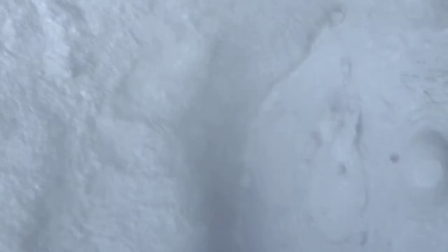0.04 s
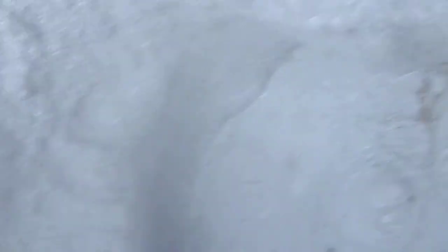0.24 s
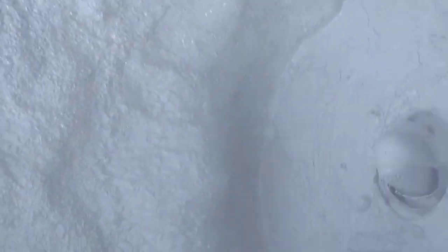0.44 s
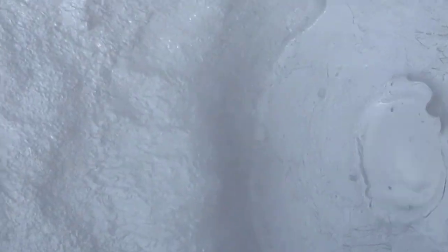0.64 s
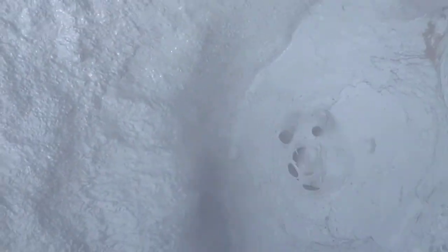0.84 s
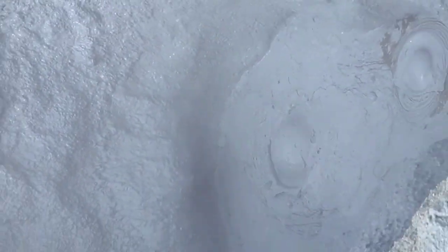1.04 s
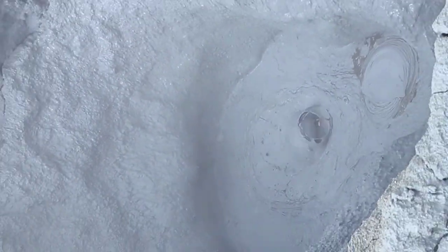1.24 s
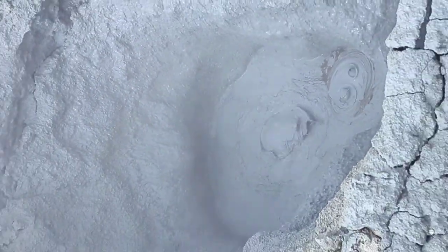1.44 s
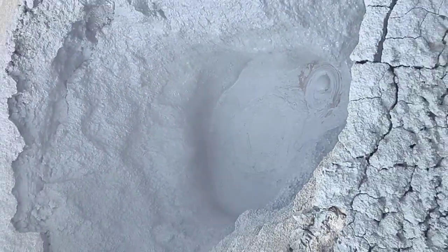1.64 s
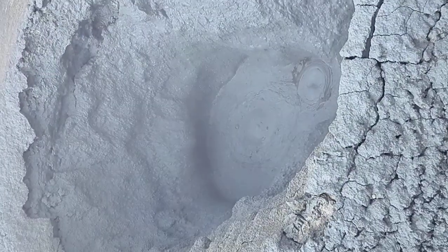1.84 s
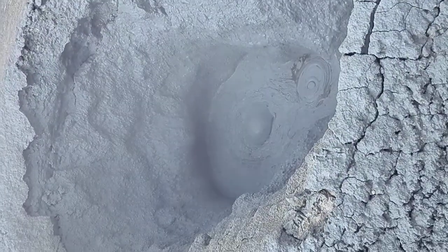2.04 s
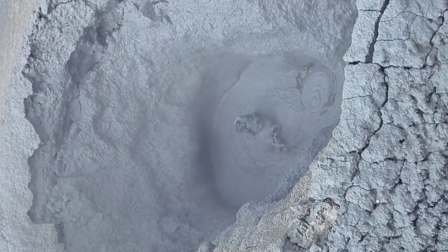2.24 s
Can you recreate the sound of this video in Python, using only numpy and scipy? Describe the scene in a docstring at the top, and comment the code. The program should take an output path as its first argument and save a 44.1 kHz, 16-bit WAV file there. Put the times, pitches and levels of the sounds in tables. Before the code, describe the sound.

A pool of thick mud bubbles in the open air, with dull plops, wet flecks and faint puffs of gas. A thin motor whine with one sharp click passes in the middle, while wind rumbles softly on the microphone.

```python
"""A pool of thick mud boils outdoors. Big bubbles burst with low plops as their cavities resonate,
flecks spatter back and gas puffs out, over a dense churn of small bubbles, a low wind and faint steam.
Midway a small motor ticks up to a thin buzz, its gear teeth exciting the resonances of its housing.
The gear clacks lightly as it starts and once loudly later; the level dips and recovers, and the
motor stops."""
import sys
import numpy as np
from scipy import signal
from scipy.fft import rfft, irfft
from scipy.io import wavfile

SR = 44100
rng = np.random.default_rng(int(sys.argv[2]) if len(sys.argv) > 2 else 0)


def transcribe(signal):
    """Save signal, clipped to [-1, 1], as a 16-bit WAV file at the path in sys.argv[1]."""
    frames = np.atleast_2d(signal).T
    limited = np.clip(frames, -1, 1)
    pcm = np.round(limited * 32767).astype(np.int16)
    wavfile.write(sys.argv[1], SR, pcm)


N = 105840


def undb(db):
    """Convert decibels to an amplitude ratio."""
    return 10 ** (np.asarray(db) / 20)


def unit(x):
    """Normalise to an rms of 1."""
    return x / np.sqrt(np.mean(x ** 2) + 1e-20)


def clock():
    """Time of every sample in seconds."""
    return np.arange(N) / SR


def curve(table, column=1):
    """Linear interpolation of one column of a table over time."""
    rows = np.array(table)
    return np.interp(clock(), rows[:, 0], rows[:, column])


def colour(x, spectrum):
    """Minimum-phase filter that keeps the power of white noise. Each row: frequency in Hz, gain in dB."""
    size = 2 * N
    hz, db = np.array(spectrum, float).T
    bin_hz = np.arange(N + 1) * SR / size
    gain = unit(undb(np.interp(np.log(bin_hz + 1), np.log(hz), db)))
    cepstrum = irfft(np.log(gain))
    cepstrum[1:N] *= 2  # folding the cepstrum makes the filter causal
    cepstrum[N + 1:] = 0
    return irfft(rfft(x, size) * np.exp(rfft(cepstrum)))[:N]


def noise():
    """Gaussian white noise."""
    return rng.standard_normal(N)


def walk(per_s):
    """Random fluctuation of rms 1, with per_s turning points a second."""
    knots = rng.standard_normal(2048)
    return unit(np.interp(clock() * per_s, np.arange(len(knots)), knots))


def add(out, start, x):
    """Superpose x on out at a start time in seconds."""
    i = int(np.clip(start * SR, 0, N - 1))
    out[i:i + len(x)] += x[:N - i]


def burst(decay_s, size=4096):
    """Exponentially damped noise, whose energy is set by its decay time."""
    envelope = np.exp(-np.arange(size) / SR / decay_s)
    return unit(rng.standard_normal(size) * envelope) * np.sqrt(np.mean(envelope ** 2))


def bubble(hz, cycles, rise_per_cycle=0.0046):
    """Damped cavity resonance: the tone peaks after the given cycles and dies, its pitch rising a little."""
    elapsed = np.arange(int(6 * cycles / hz * SR)) * hz / SR  # in cycles
    envelope = (elapsed / cycles * np.exp(1 - elapsed / cycles)) ** 2
    return envelope * np.sin(2 * np.pi * elapsed * (1 + rise_per_cycle * elapsed / 2))


def crowd(per_s, low_hz, high_hz, spread_db, cycles):
    """Incoherent sum of bubbles at random times and pitches, most weak and a few strong."""
    out = np.zeros(N)
    for when, pitch, strength, length in rng.random((int(per_s * N / SR), 4)):
        hz = low_hz * (high_hz / low_hz) ** pitch
        gain = hz * undb(-spread_db * np.log(1 - .98 * strength))
        add(out, when * N / SR, gain * bubble(hz, cycles * (.5 + length)))
    return out


def churn():
    """Small bubbles resonate and the mud absorbs their treble: larger ones gulp, finer ones simmer."""
    # Strength of the churn. Each row: time in seconds, level of larger and of finer bubbles in dB.
    levels = [(0, -38, -39.5), (.18, -36, -40.5), (.3, -44, -46.5), (.42, -35.5, -44.5), (.52, -39.5, -46),
              (.67, -38, -45.5), (.85, -39.5, -48), (1.1, -39, -48), (1.25, -42, -49.5), (1.45, -37.5, -50),
              (1.6, -36.5, -49.5), (1.7, -35, -42), (1.77, -40.5, -47.5), (1.9, -36, -39.5),
              (2.02, -37, -40.5), (2.15, -36, -42), (2.39, -41, -43.5)]
    # Muffling of each size of bubble. Each row: frequency in Hz, relative gain in dB.
    larger_spectrum = [(50, -47.5), (110, -11), (190, 3), (300, 0), (400, -14.5), (600, -16.5), (1000, -27),
                       (2000, -51)]
    finer_spectrum = [(200, -22), (380, 3.5), (520, 1), (800, -2.5), (1050, -13.5), (1400, -29),
                      (2400, -31.5), (3200, -35.5), (4000, -52), (7000, -72)]
    larger = crowd(per_s=700, low_hz=91.8, high_hz=727, spread_db=2.0, cycles=1.33)
    finer = crowd(per_s=2600, low_hz=299.5, high_hz=4090, spread_db=1.36, cycles=1.89)
    gulps = unit(colour(larger, larger_spectrum)) * undb(curve(levels))
    simmer = unit(colour(finer, finer_spectrum)) * undb(curve(levels, column=2))
    return gulps + simmer


def wind():
    """Turbulent pressure fluctuations make a low buffeting."""
    # Spectrum of the buffeting. Each row: frequency in Hz, relative gain in dB.
    spectrum = [(10, 1), (22, -7), (45, 4), (80, 0), (130, -1.5), (300, -27.5), (900, -61.5)]
    # Gusts and lulls. Each row: time in seconds, level in dB.
    gusts = [(0, -32.5), (.22, -37.5), (.32, -38.5), (.55, -32), (.8, -35), (1.2, -38), (1.55, -35.5),
             (1.84, -29), (1.96, -31.5), (2.15, -35), (2.39, -33.5)]
    return unit(colour(noise(), spectrum)) * undb(curve(gusts))


def steam():
    """Flow noise of air and steam: a faint hiss whose level flickers."""
    # Spectrum of the hiss. Each row: frequency in Hz, relative gain in dB.
    spectrum = [(1000, 19.5), (2200, -2), (4500, -6), (8000, -11.5), (12000, -3.5), (15500, 8)]
    # Slow swell of the hiss. Each row: time in seconds, mean level in dB.
    levels = [(0, -59), (.13, -71), (.5, -59.5), (.65, -63), (.8, -80), (1.6, -83), (1.76, -62), (2.1, -59),
              (2.39, -57)]
    flicker_db = -1.3
    return colour(noise(), spectrum) * undb(curve(levels) + flicker_db * walk(per_s=17.5))


def puffs():
    """Gas escapes through wet mud as turbulent noise, amplitude-modulated into short, grainy spurts."""
    # Spurts of gas. Each row: centre and Gaussian half-width in seconds, hiss and sputter levels in dB.
    spurts = [(0.025, 0.007, -51.5, -77), (0.041, 0.043, -55.5, -57), (0.236, 0.053, -61.5, -61),
              (0.455, 0.047, -68, -56.5), (0.59, 0.035, -54, -57.5), (0.653, 0.0078, -53.5, -52),
              (0.712, .02, -62, -60), (1.716, 0.021, -60, -51), (1.806, 0.01, -60, -56),
              (1.937, 0.028, -51, -52.5), (2.037, 0.014, -54, -58), (2.149, 0.015, -48.5, -55.5),
              (2.198, 0.011, -59, -53.5), (2.318, 0.013, -49, -59)]
    # Spectra of the hiss and the duller sputter. Each row: frequency in Hz, relative gain in dB.
    hiss_spectrum = [(1000, 13), (3000, -12), (6000, -14.5), (10000, -2.5), (14000, 1), (16000, 2)]
    sputter_spectrum = [(400, 7), (1000, 7), (2400, 3.5), (4000, -2.5), (6000, -8.5), (12000, -22)]
    hiss, sputter = np.zeros(N), np.zeros(N)
    for centre, half_width, hiss_db, sputter_db in spurts:
        envelope = np.exp(-((clock() - centre) / half_width) ** 2 / 2)
        hiss += undb(hiss_db) * envelope
        sputter += undb(sputter_db) * envelope
    grain_db = 3.17
    grain = unit(undb(grain_db * walk(per_s=500)))
    return (colour(noise() * grain * hiss, hiss_spectrum)
            + colour(noise() * grain * sputter, sputter_spectrum))


def flecks():
    """Impact noise of thrown mud: a wet snap on a soft thud, with a brief resonance of trapped air."""
    # Landings. Each row: start in seconds, relative snap level in dB, snap cutoff in Hz,
    # relative level of thud and note in dB.
    landings = [(.027, -33, 16000, -29.5), (.137, -32.5, 3700, -29.5), (.176, -45, 15000, -29.5),
                (.181, -49, 7000, -25), (.2, -43, 7000, -22.5), (0.2094, -27.5, 16100, -30),
                (.214, -37, 15000, -16.5), (0.2468, -37, 7000, -23), (0.2542, -23.5, 15100, -29),
                (0.2641, -25, 6760, -27), (0.2998, -31, 5100, -28.5), (.325, -45, 9100, -25),
                (0.3508, -41, 7500, -27.5), (0.3827, -29.5, 5300, -25.5), (.3905, -38, 5760, -22),
                (0.414, -50, 5000, -29.5), (.675, -54, 3000, -29.5), (2.153, -36.5, 16200, -34),
                (2.346, -55, 2500, -31)]
    # Spectra of the two parts of an impact. Each row: frequency in Hz, relative gain in dB.
    snap_spectrum = [(500, -2), (1500, -3), (2800, 2.5), (4800, -1.5), (7000, -2), (10000, 1), (14000, 1)]
    thud_spectrum = [(100, 2), (350, 2.5), (750, -1.5), (1100, -22.5), (1800, -25), (5000, -44.5)]
    snap_trim_db, thud_trim_db, note_trim_db = -2.5, -0.5, -13
    snap, thud, note = np.zeros(N), np.zeros(N), np.zeros(N)
    for start, snap_db, cutoff_hz, thud_db in landings:
        lowpass = signal.butter(6, min(cutoff_hz, .45 * SR), fs=SR, output="sos")
        add(snap, start, undb(snap_db + snap_trim_db) * signal.sosfilt(lowpass, burst(decay_s=0.001)))
        add(thud, start, undb(thud_db + thud_trim_db) * burst(decay_s=0.0052))
        note_hz = 662 * (1 + 0.29 * rng.standard_normal())
        add(note, start, undb(thud_db + note_trim_db) * bubble(note_hz, cycles=0.68))
    return colour(snap, snap_spectrum) + note + colour(thud, thud_spectrum)


def plops():
    """Big bubbles ring at their low cavity resonance while their skin tears with a dull splat."""
    # Bursting bubbles. Each row: start in seconds, pitch in Hz, level in dB, cycles to the peak.
    big_bubbles = [(0.197, 151, -12.5, 1.06), (.221, 177.5, -4.5, 0.74), (0.223, 295, -16.5, 2.6),
                   (.227, 460, -19.5, 1.25), (0.414, 75.6, -22, 1.5), (.441, 127, -23, 0.56),
                   (0.474, 192, -26, 1.3), (.545, 79, -22.5, 1.1), (.554, 233, -24.5, 1.41),
                   (0.602, 101, -29.5, 1.1), (.614, 173, -26, 1), (.707, 155.8, -17, 0.96),
                   (.845, 196, -27.5, 1.36), (1.01, 165, -35.5, 2.0), (1.139, 91.6, -22, 0.46),
                   (1.36, 92.7, -25, 0.98), (1.418, 87, -21, 0.84), (1.518, 186, -26.5, 1.64),
                   (1.55, 88.3, -22, 0.79), (1.62, 145.3, -16.5, 1.45), (1.645, 184, -18, 1.23),
                   (1.674, 72, -20.5, 0.73), (1.695, 499, -29, 2.6), (1.705, 275, -26.5, 1.68),
                   (1.709, 152, -15, 1.03), (1.775, 142.6, -20.5, 1.09), (1.813, 190, -26, 1.5),
                   (1.848, 182, -15, 0.46), (1.862, 190, -17.5, 1.1), (1.888, 233, -14, 0.46),
                   (2.032, 80, -20.5, 0.44), (2.033, 834, -32.5, 4.9), (2.14, 526, -25.5, 3.4),
                   (2.25, 88.7, -24, 0.55), (2.345, 404, -29, 1.1), (2.39, 140, -20, 0.5)]
    # Spectrum of the tearing skin. Each row: frequency in Hz, relative gain in dB.
    splat_spectrum = [(100, -16), (300, 4), (480, 13), (750, -12), (1300, -25), (3000, -32.5), (8000, -42)]
    splat_trim_db = -19.5
    tone, splat = np.zeros(N), np.zeros(N)
    for start, hz, db, cycles in big_bubbles:
        add(tone, start, undb(db) * bubble(hz, cycles))
        tear_s = start + cycles / hz / 2  # halfway to the tone's peak
        add(splat, tear_s, undb(db + splat_trim_db) * burst(decay_s=0.0073))
    return tone + colour(splat, splat_spectrum)


def motor():
    """Forced vibration: gear teeth click and scrape, strong and weak in turn, driving a small housing."""
    # The motor's run. Each row: time in seconds, ticks per second, whine and ring levels in relative dB.
    run = [(.64, 50.2, -65, -70), (.68, 65, -54, -51.5), (.73, 130, -52, -53.5), (.81, 180, -50.5, -59.5),
           (.87, 235, -50, -59), (.915, 292, -48.5, -58), (.96, 264, -51, -61), (1.04, 246, -50, -57.5),
           (1.11, 312, -50, -61.5), (1.15, 224, -52, -62), (1.2, 346, -50, -59.5), (1.27, 255, -54.5, -69),
           (1.36, 327, -55.5, -70), (1.44, 232, -57.5, -73), (1.53, 335, -56.5, -69), (1.6, 217, -56, -68),
           (1.735, 250, -52, -63)]
    # Resonances of the bright whine and the lower ring. Each row: frequency in Hz, relative gain in dB.
    whine_spectrum = [(1000, -45), (5000, -53), (8500, -13.5), (9600, -5.5), (11000, -6.5), (12400, 2.5),
                      (13800, 1), (15000, -9), (16000, -3)]
    ring_spectrum = [(1000, 4.5), (2600, -11.5), (3200, -3.5), (3900, -31), (5100, -28), (6000, -1.5),
                     (7600, -0.5), (8600, -17.5), (9600, 1), (12000, -4.5)]
    start_s, stop_s, tick_decay_s, rate_jitter = run[0][0], 1.741, .0005, .015
    scatter_db, alternate_db, rub_db, click_db = .6, .9, -6, -1
    t, tick_rate = clock(), curve(run)
    teeth_passed = np.cumsum(tick_rate * (1 + rate_jitter * walk(per_s=200))) / SR
    tooth = teeth_passed.astype(int)
    since_tick = (teeth_passed % 1) / tick_rate
    strength = undb(scatter_db * noise()[tooth] + alternate_db * (-1.) ** tooth)
    scrape = noise() * (unit(strength * np.exp(-since_tick / tick_decay_s)) + undb(rub_db))
    click = undb(click_db) * unit(strength * np.diff(tooth, prepend=0))
    drive = unit(scrape + click) * ((t > start_s) & (t < stop_s))
    whine = colour(drive * undb(curve(run, column=2)), whine_spectrum)
    ring = colour(drive * undb(curve(run, column=3)), ring_spectrum)
    return whine + ring


def clacks():
    """Impulsive excitation: knocks in the motor's gear sound bright, heavily damped resonances."""
    # Knocks of the gear. Each row: start in seconds, level in dB.
    knocks = [(0.652, -49), (.682, -37), (0.705, -33.5), (1.2302, -22.5)]
    # Resonances of a clack. Each row: frequency in Hz, relative gain in dB.
    spectrum = [(600, -19), (2200, -11.5), (3000, -19), (3900, -34), (5500, -31), (6800, -18), (8300, -4.5),
                (9500, -23), (11000, -7), (12500, 1), (15500, -2)]
    impacts = np.zeros(N)
    for start, db in knocks:
        add(impacts, start, undb(db) * burst(decay_s=.0008))
    return colour(impacts, spectrum)


def scene():
    """Superposition of the mud pool, the wind and the motor in one channel."""
    return (plops() + flecks() + puffs() + churn() + wind() + steam() + motor() + clacks())[None]


def record(dry):
    """Gain modulation and band limiting: the level dips after the loudest clack; the top treble is cut."""
    dip_start_s, dip_db, attack_s, recovery_s = 1.233, -12, 0.0014, .16
    cutoff_hz = 15900
    since = clock() - dip_start_s
    gain_db = dip_db * np.clip(since / attack_s, 0, 1) * np.exp(-np.maximum(since, 0) / recovery_s)
    lowpass = signal.ellip(10, .2, 80, cutoff_hz, fs=SR, output="sos")
    return signal.sosfilt(lowpass, dry * undb(gain_db))


dry = scene()
out = record(dry)
transcribe(out)
```